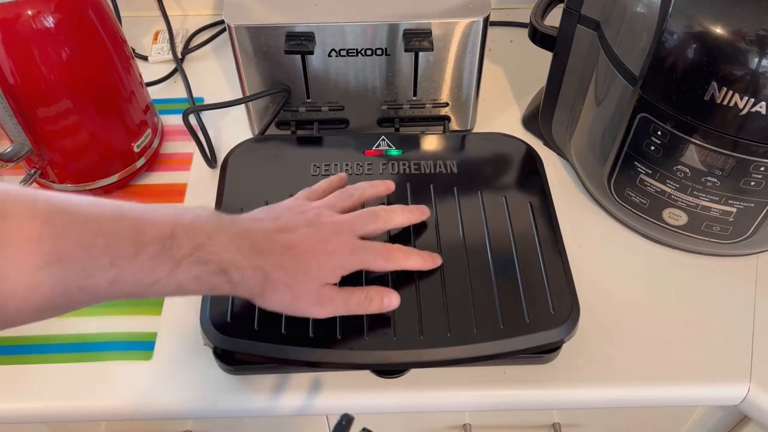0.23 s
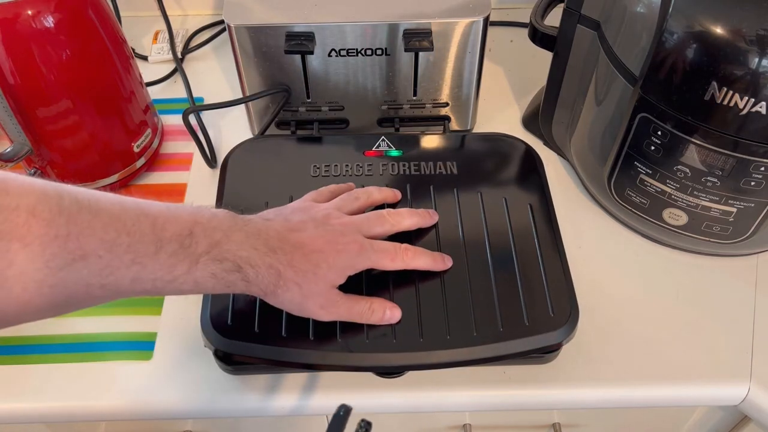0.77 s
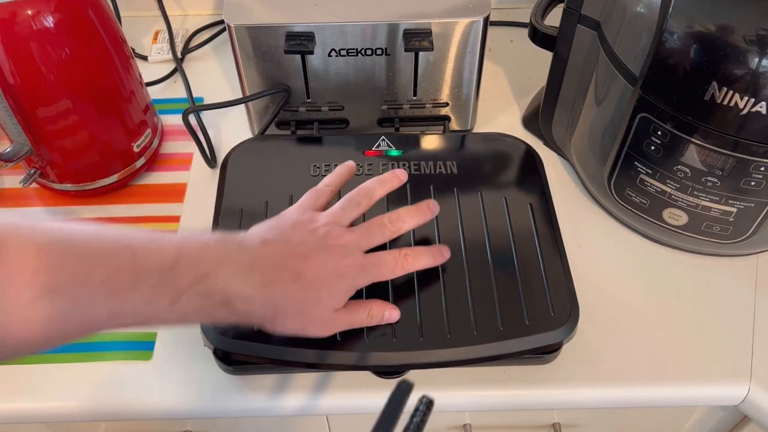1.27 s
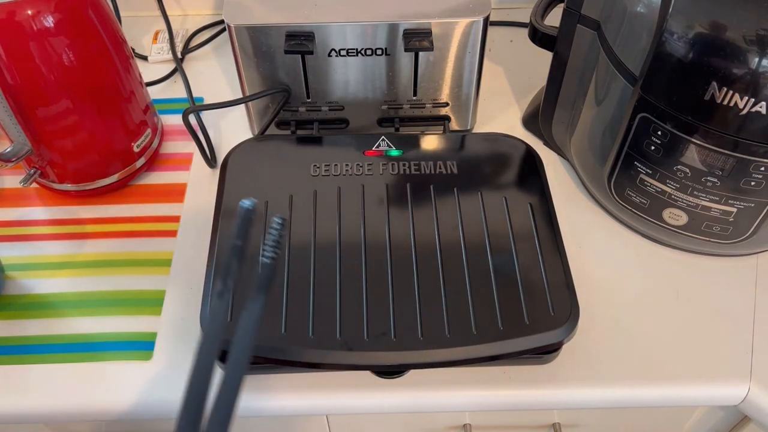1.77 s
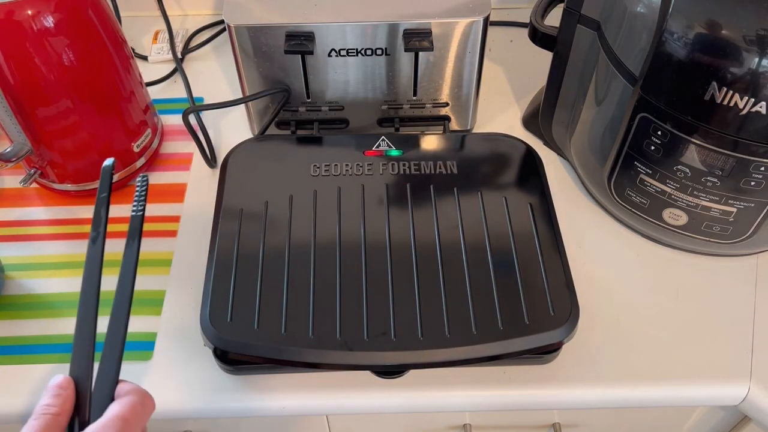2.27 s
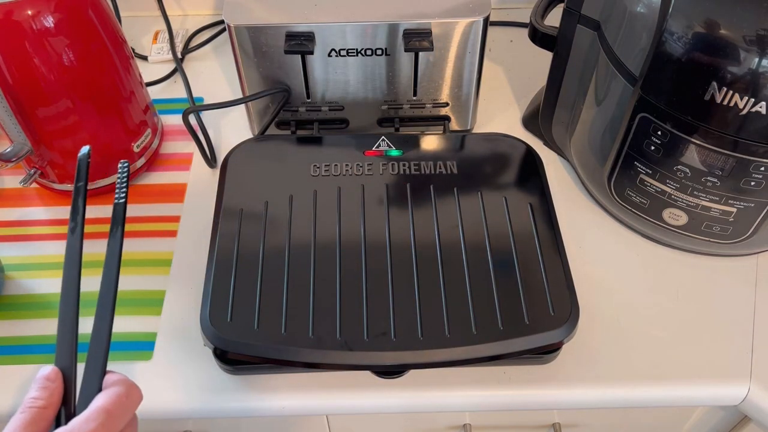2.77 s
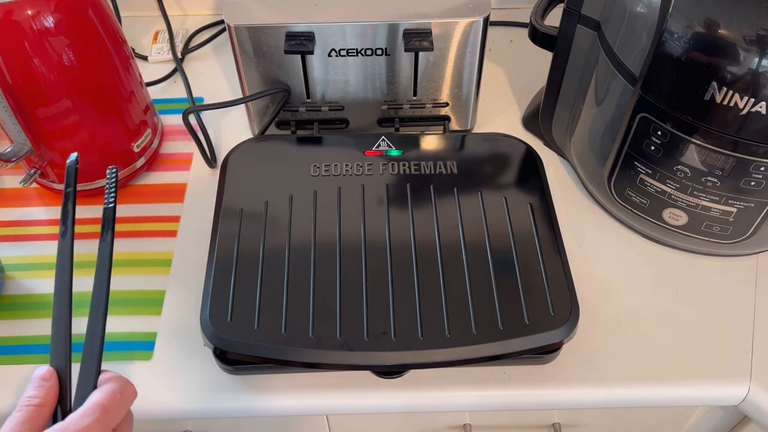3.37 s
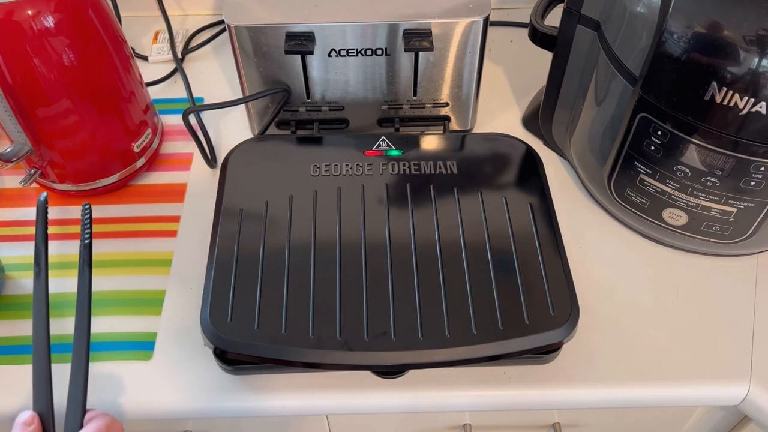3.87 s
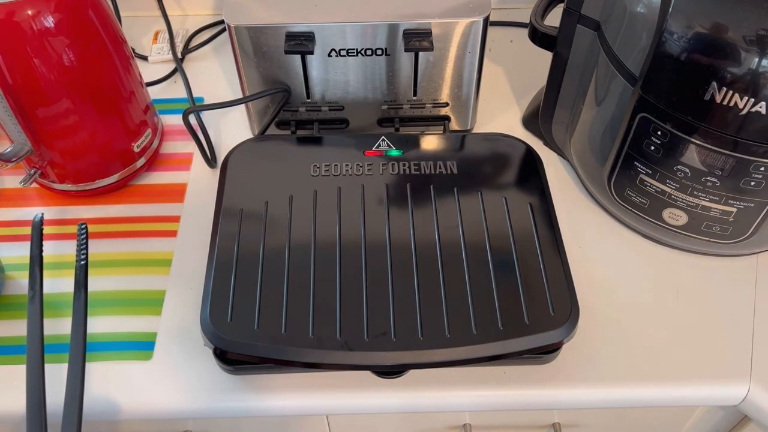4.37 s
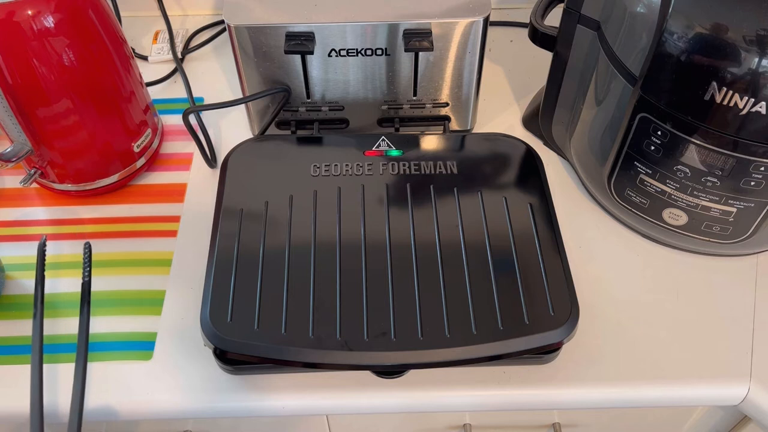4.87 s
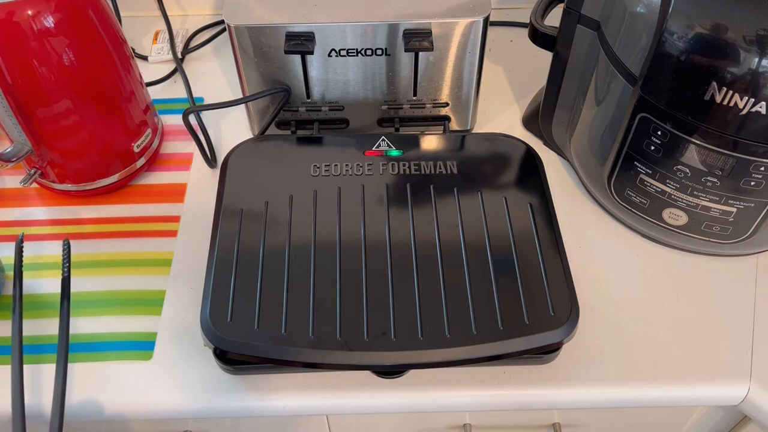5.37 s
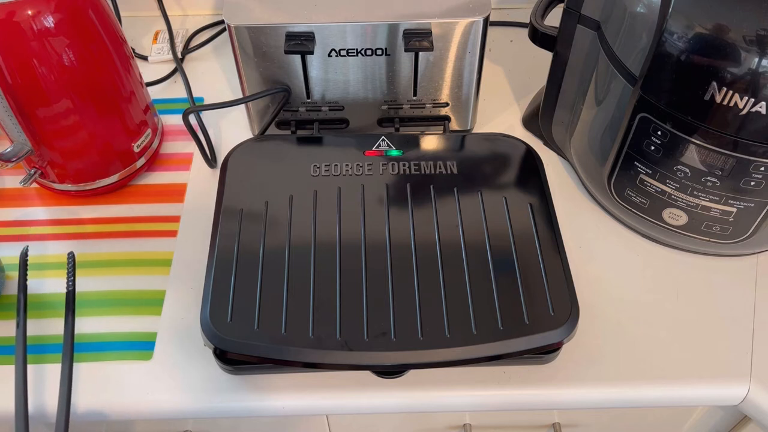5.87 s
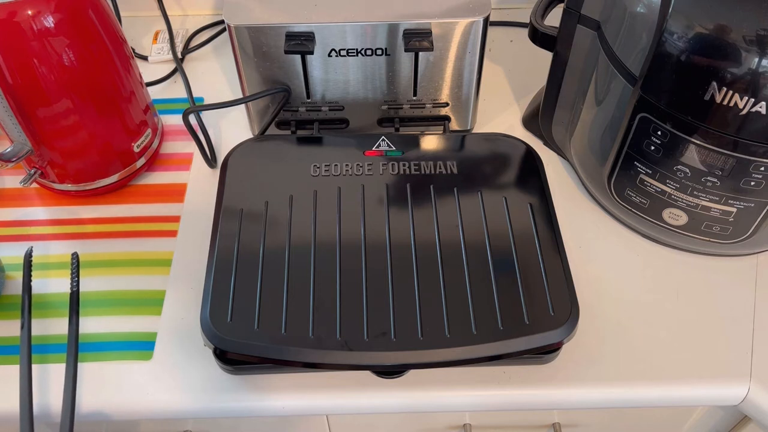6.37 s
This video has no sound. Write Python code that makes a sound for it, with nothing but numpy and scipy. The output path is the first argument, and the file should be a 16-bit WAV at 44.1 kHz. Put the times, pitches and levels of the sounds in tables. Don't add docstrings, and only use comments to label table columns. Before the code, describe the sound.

Close steady frying hiss from a shut electric grill, fiercest at the start, easing gradually, with tiny fat spits and a small thermostat snap near the end.

```python
import sys
import numpy as np
from scipy import signal
from scipy.fft import rfft, irfft, next_fast_len
from scipy.io import wavfile
from scipy.ndimage import uniform_filter1d, map_coordinates

SR = 44100
rng = np.random.default_rng(int(sys.argv[2]) if len(sys.argv) > 2 else 0)


def invert_db(x):
    u = np.asarray(x, float) / 20
    return 10 ** u


def generate_wav(signal):
    frames = np.transpose(np.atleast_2d(signal))
    scaled = np.clip(frames, -1, 1) * 32767
    pcm = np.round(scaled).astype(np.int16)
    wavfile.write(sys.argv[1], SR, pcm)


N = 291962

# frequency in Hz, level in dB per Hz.
BOOM_COLOUR = [(150, -30), (250, -4), (290, -8.5), (330, -1), (400, -1.5), (475, 2.5), (510, -3.5),
               (555, -9.5), (620, -12.5), (700, -7.5), (800, -9.5), (900, -8.5), (1170, -41), (1980, -120)]
# frequency in Hz, level in dB per Hz.
BODY_COLOUR = [(440, -45), (750, -21.5), (910, -13), (949, 0), (1030, -5), (1120, -2.5), (1310, -7),
               (1660, -5.5), (1840, -8), (2170, -5), (2700, -13), (3510, -58), (5940, -120)]
# frequency in Hz, level in dB per Hz.
FIZZ_COLOUR = [(2200, -120), (2400, -9.5), (2700, -4), (3200, 1), (3600, -2), (4300, -1.3), (5300, -2),
               (6500, -2.5), (7600, 0.5), (8200, -4), (8500, -120)]
# frequency in Hz, level in dB per Hz.
JET_COLOUR = [(7500, -120), (7800, -21), (8400, 0.5), (9400, -1.5), (10100, -0.5), (10700, -0.5),
              (11300, 4), (11700, 1.5), (12100, -3.5), (13200, -4), (14000, -4.5), (14800, -1.5),
              (15300, -3), (15900, -6.5)]
# frequency in Hz, width in Hz, lift in dB.
GAP_MODES = [(433, 59, 0.5), (770, 35, -1.5), (914, 14, 5), (977, 42, 5), (1082, 26, 4.5), (1147, 25, 5.5),
             (1227, 27, 3), (1330, 23, -1), (1325, 34, 2), (1677, 82, 6), (1730, 35, -2.5), (1990, 58, 3.5),
             (2035, 57, -6), (2096, 64, 2.5), (2760, 60, 0.5), (3010, 69, 2), (3140, 110, -0.5),
             (3410, 92, 1), (3576, 100, -3.5), (3800, 60, 4.5), (3865, 100, -5), (4050, 58, 4.5),
             (4170, 50, -3.5), (4260, 120, 3.5), (4970, 50, 5), (5300, 80, 0.5), (5620, 110, 4),
             (6440, 66, -1), (7800, 80, 2), (8450, 280, 1.5)]
# frequency in Hz, likeness from 0 to 1,
# lead of the right port in radians.
PORT_LIKENESS = [(30, .99, 0), (130, .95, 0), (400, .85, -.15), (650, .68, .2), (1150, .86, .05),
                 (1450, .36, .45), (1800, .2, .5), (2200, .75, -.35), (3200, .7, -1.1), (5000, .68, -.3),
                 (6200, .42, -.3), (7300, .65, -.85), (8000, .8, -.55), (8380, .93, 0)]
# frequency in Hz, left minus right in dB.
PORT_LEAN = [(30, -.9), (70, .1), (160, -1.4), (260, 1.2), (420, 2.6), (550, -.6), (800, -.3), (1100, 2.2),
             (1750, 3.6), (2200, .3), (2800, 1.8), (4200, 4.5), (6600, 4.8), (7600, 0), (16000, 0)]
# time in seconds, cover from 0 to 1.
HAND_COVER = [
    (0, 0.1),
    (.2, 0.7),
    (1.22, .9),
    (1.36, 0.2),
    (6.62, 0),
]
# frequency in Hz, change in dB.
HAND_SHADE = [(2500, 1.5), (4300, 1.5), (5000, -2.5), (7000, 1), (7800, 0.5)]
# start in seconds, peak level in dB.
FAT_SPITS = [
    (1.1074, -28),
    (1.2825, -22),
    (1.4207, -26),
    (2.4973, -38),
    (4.6579, -31),
    (4.7457, -26),
    (4.9412, -32),
    (5.4705, -35),
    (5.9828, -32),
    (6.0537, -29),
]
# frequency in Hz, gain in dB.
TONGS_COLOUR = [(90, -40), (150, 0), (240, 0), (400, -5), (800, -9), (1400, -50)]
# start in seconds, level in dB,
# extra level of the housing in dB, left minus right in dB.
SNAP_HITS = [
    (6.0545, -31, -3, 9),
    (6.0577, -28, -11, 9),
    (6.0615, -43.5, 7.5, 1.5),
    (6.0645, -42, -9, 4),
    (6.0715, -55, 10, .4),
]
# frequency in Hz, level in dB, time to fall 60 dB in seconds.
SPRING_MODES = [(3200, -13, .018), (3650, -8, .022), (4200, -7, .02), (4450, -4, .03), (4750, -11, .018),
                (5000, 0.5, 0.031), (5130, -12, .28), (5300, -6, .018), (5650, -9, .015), (6080, -7, .025)]
# frequency in Hz, level in dB, time to fall 60 dB in seconds.
HOUSING_MODES = [(452, -6, .09), (604, -8, 0.039), (792, -1.5, 0.12), (905, -14, 0.044), (1070, -6, 0.032),
                 (1770, -3, 0.023), (2200, -2, 0.026), (2750, -7, .025)]
# frequency in Hz, level in dB rms,
# unsteadiness in dB, left minus right in dB.
HUM_LINES = [(26.6, -75, 5.5, -1.5), (48.9, -64, 1.3, -3), (68.3, -62.5, 1, -1), (93.44, -48.5, 0.6, 0.6),
             (100, -64.5, 0, -1), (135.6, -70.5, 0, -10), (162.4, -63.5, 1.0, -3), (186.6, -69, -0.5, -8),
             (198.6, -73.5, 1.5, 2), (241.2, -67.5, 0.5, -2), (320, -69.5, 1.5, -5)]
# frequency in Hz, level in dB per Hz.
RUMBLE_COLOUR = [(12, -49), (20, -7), (43, -13), (66, 1.5), (91, -1.5), (117, -9.5), (145, -9.5),
                 (245, -7.5), (282, -10.5), (400, -8.5), (520, -59), (880, -120)]

DELAY_SPLIT_HZ = 8380
PORT_DELAY = 4 * np.pi / (15600 - DELAY_SPLIT_HZ)
COOL_S = 1.51
PRESS_S, PUSH_S = 0.24, 0.2
LIFT_S, EASE_S = 1.154, 0.22
JUICE, JUICE_S = 0.37, 0.53


def unit(x):
    return x / np.sqrt(np.mean(x ** 2) + 1e-20)


def mid_unit(pair):
    return pair / np.sqrt(np.mean(pair.mean(0) ** 2))


def along(points, hz, col=1):
    columns = np.transpose(points)
    return np.interp(np.log(hz + 1), np.log(columns[0] + 1), columns[col])


def wobble(rate):
    knots = rng.standard_normal(int(N * rate / SR) + 4)
    return map_coordinates(knots, [np.arange(N) * rate / SR])


def filtered(x, response):
    m = next_fast_len(N + 8192)
    return irfft(rfft(x, m) * response(np.fft.rfftfreq(m, 1 / SR)), m)[..., :N]


def panned(pan_db):
    return invert_db([[pan_db / 2], [-pan_db / 2]])


def at_ports(pair, gain):
    def shared_and_different(hz):
        likeness = along(PORT_LIKENESS, hz) + (hz > 9000) * 0.086
        turn = np.arccos(np.clip(likeness, 0, 1)) / 2
        return gain(hz) * np.array([np.cos(turn), np.sin(turn)])

    def left_and_right(hz):
        lead = along(PORT_LIKENESS, hz, col=2) + PORT_DELAY * np.maximum(hz - DELAY_SPLIT_HZ, 0)
        half = invert_db(along(PORT_LEAN, hz) / 2) * np.exp(-.5j * lead)
        return np.array([half, 1 / half])

    shared, different = filtered(pair, shared_and_different)
    return filtered(np.array([shared + different, shared - different]), left_and_right)


def under_lid(colour):
    def lift(hz):
        return sum(db / (1 + (2 * (hz - centre) / width) ** 2) for centre, width, db in GAP_MODES)
    return lambda hz: invert_db(along(colour, hz) + lift(hz))


def sizzle():
    t = np.arange(N) / SR
    fresh = np.exp(-t / COOL_S)
    push = np.clip((t - PRESS_S) / PUSH_S, 0, 1)
    grip = np.clip(1 - (t - LIFT_S) / EASE_S, 0, 1)
    juice = np.exp(-np.maximum(t - LIFT_S, 0) / JUICE_S)
    force = push * ((1 - JUICE) * grip + JUICE * juice)
    flutter = 0.27 * wobble(30) + 0.21 * wobble(70) + 0.49 * wobble(160)

    smooth = patchy(rng.standard_normal((2, N)), patchy_db=0.43)
    grainy = patchy(bursts(per_second=9000, spread_db=2.5, steam_db=6.0), patchy_db=0.37)

    def layer(source, colour, simmer_db, fresh_db, force_db, flutter_share):
        level_db = simmer_db + fresh_db * fresh + force_db * force
        level_db = level_db + flutter_share * flutter + 0.17 * wobble(2.44)
        return invert_db(level_db) * mid_unit(at_ports(source, under_lid(colour)))

    boom = layer(smooth, BOOM_COLOUR, simmer_db=-58.5, fresh_db=3, force_db=4, flutter_share=0.5)
    body = layer(smooth, BODY_COLOUR, simmer_db=-50, fresh_db=5.5, force_db=3.5, flutter_share=0.24)
    fizz = layer(grainy, FIZZ_COLOUR, simmer_db=-50.5, fresh_db=6.5, force_db=4.5, flutter_share=0.6)
    jet = layer(grainy, JET_COLOUR, simmer_db=-49.5, fresh_db=6, force_db=5, flutter_share=0.6)
    return counter(boom + body + shaded(fizz), ripple_db=1.12, width_hz=35) + jet


def bursts(per_second, spread_db, steam_db):
    size = invert_db(spread_db * rng.exponential(size=(2, N))) * rng.choice([-1, 1], (2, N))
    pops = size * (rng.random((2, N)) < per_second / SR)
    return unit(pops) + invert_db(steam_db) * rng.standard_normal((2, N))


def patchy(pair, patchy_db):
    z = signal.stft(pair, nperseg=512)[2]
    field = rng.standard_normal(z.shape[1:])
    field = uniform_filter1d(field, 4, 0)
    field = uniform_filter1d(field, 10, 1)
    return signal.istft(z * invert_db(patchy_db * unit(field)), nperseg=512)[1][:, :N]


def shaded(pair):
    cover = np.clip(np.interp(np.arange(N) / SR, *np.transpose(HAND_COVER)), 0, 1)
    behind_hand = filtered(pair, lambda hz: invert_db(along(HAND_SHADE, hz)))
    return pair + cover * (behind_hand - pair)


def counter(pair, ripple_db, width_hz):
    knots = rng.standard_normal((3, 1200))

    def comb(hz, k):
        fade_in = np.clip(hz / 1500 - 1, 0, 1)
        return map_coordinates(k, [np.minimum(hz / width_hz, 1190)]) * fade_in

    def ripple(hz):
        return invert_db(ripple_db * np.array([comb(hz, knots[0]) + 0.59 * comb(hz, k) for k in knots[1:]]))

    return filtered(pair, ripple)


def spits():
    puffs = np.zeros((2, N + SR))
    t = np.arange(SR // 50) / SR
    for start_s, db in FAT_SPITS:
        envelope = invert_db(db - 4 - 60 * t / .012) * (1 - np.exp(-t / .0006))
        puffs[:, round(start_s * SR):][:, :len(t)] += envelope * rng.standard_normal((2, len(t)))
    return invert_db(6) * at_ports(puffs[:, :N], under_lid(JET_COLOUR))


def thermostat():
    out = np.zeros((2, N + SR))
    t = np.arange(SR // 4) / SR

    def ring(modes):
        total = 0
        for k, (hz, db, t60) in enumerate(modes):
            level_db = db + rng.normal(0, 2.1, (2, 1)) - 60 * t / t60
            total = total + (-1) ** k * invert_db(level_db) * np.sin(2 * np.pi * hz * t)
        return total

    for start_s, db, housing_db, pan_db in SNAP_HITS:
        hit = panned(pan_db) * ring(SPRING_MODES) + invert_db(housing_db) * ring(HOUSING_MODES)
        out[:, round(start_s * SR):][:, :len(t)] += invert_db(db - 6) * hit * (1 - np.exp(-t / .00015))
    return out[:, :N]


def tongs():
    start_s, level_db, t60_s, rise_s = 1.575, -49, .16, .012
    t = np.maximum(np.arange(N) / SR - start_s, 0)
    dull = filtered(rng.standard_normal(N), lambda hz: invert_db(along(TONGS_COLOUR, hz)))
    return invert_db(level_db - 60 * t / t60_s) * (1 - np.exp(-t / rise_s)) * unit(dull)


def kitchen():
    t = np.arange(N) / SR
    lines = np.zeros((2, N))
    for hz, db, sway_db, pan_db in HUM_LINES:
        tone = np.sin(2 * np.pi * hz * t + 0.33 * wobble(2.6))
        lines += invert_db(db + 1 + sway_db * wobble(2.955)) * tone * panned(pan_db)
    rumble = at_ports(rng.standard_normal((2, N)), lambda hz: invert_db(along(RUMBLE_COLOUR, hz)))
    return lines + invert_db(-59.5) * mid_unit(rumble)


def scene():
    return sizzle() + spits() + thermostat() + tongs() + kitchen()


def roll_off(x):
    return signal.sosfilt(signal.butter(12, 17100, fs=SR, output="sos"), x)


def record(dry):
    top_hz = 15785
    mix = filtered(dry, lambda hz: hz < top_hz)
    return roll_off(mix)


dry = scene()
out = record(dry)
generate_wav(out)
```